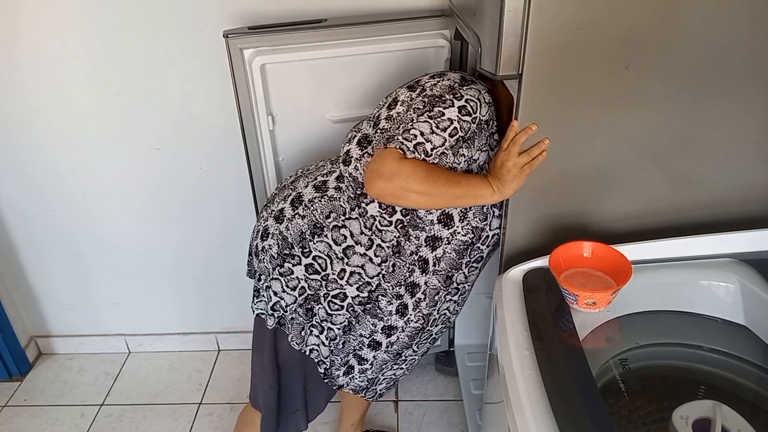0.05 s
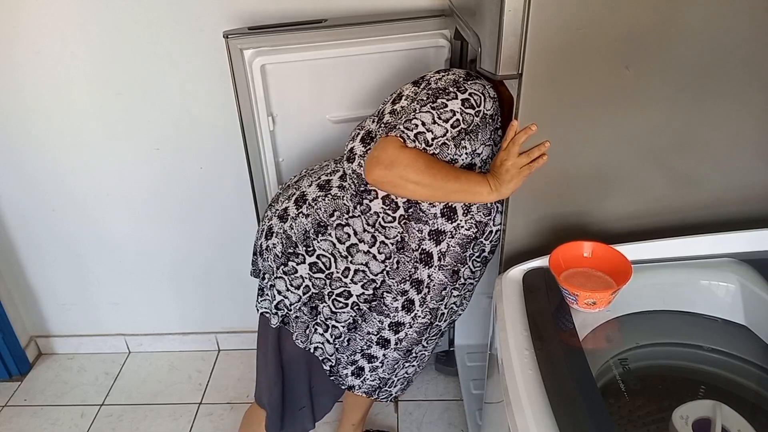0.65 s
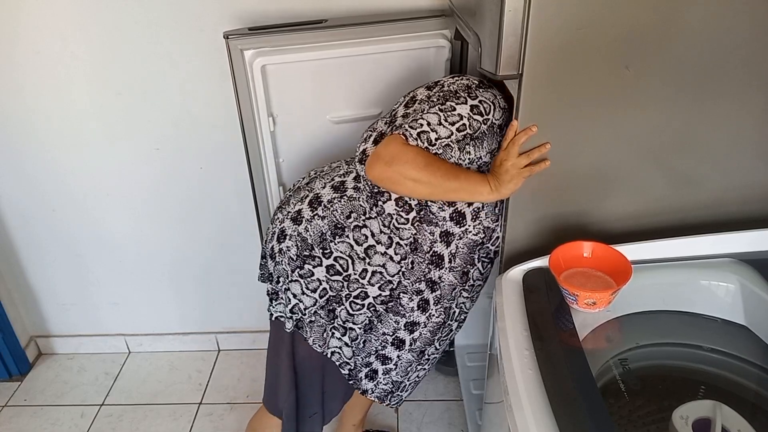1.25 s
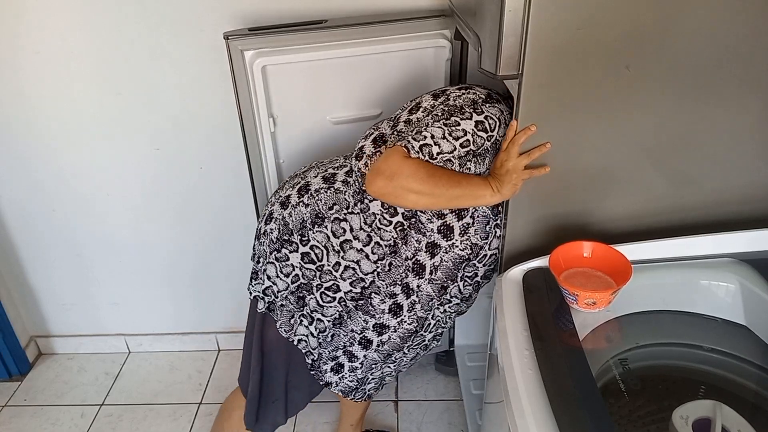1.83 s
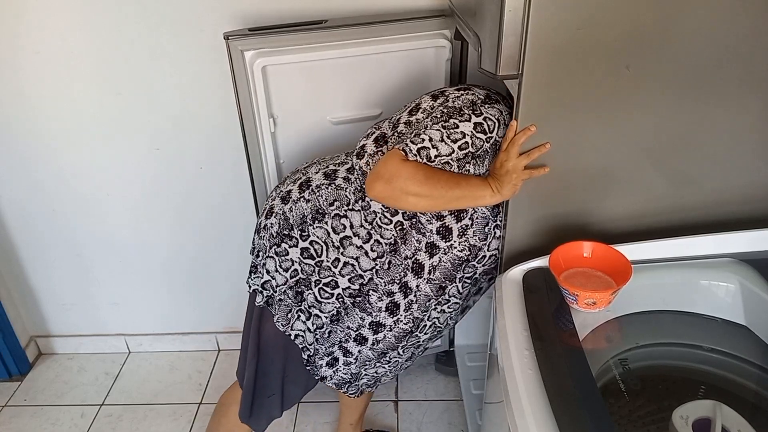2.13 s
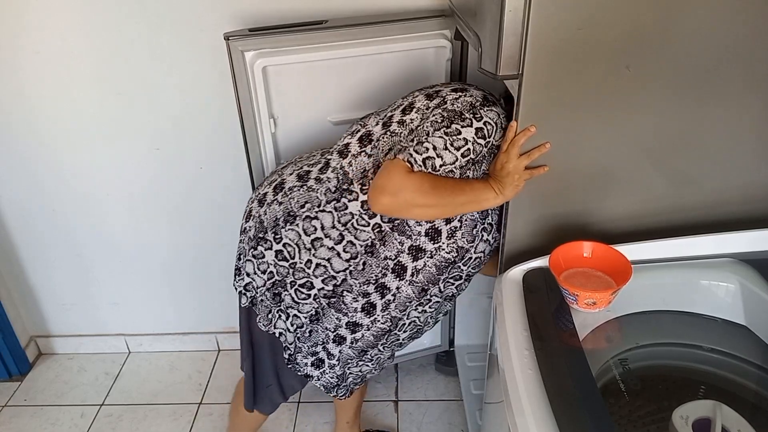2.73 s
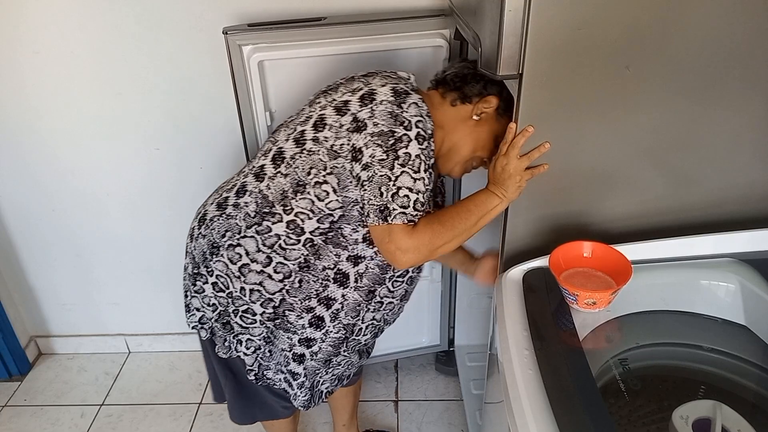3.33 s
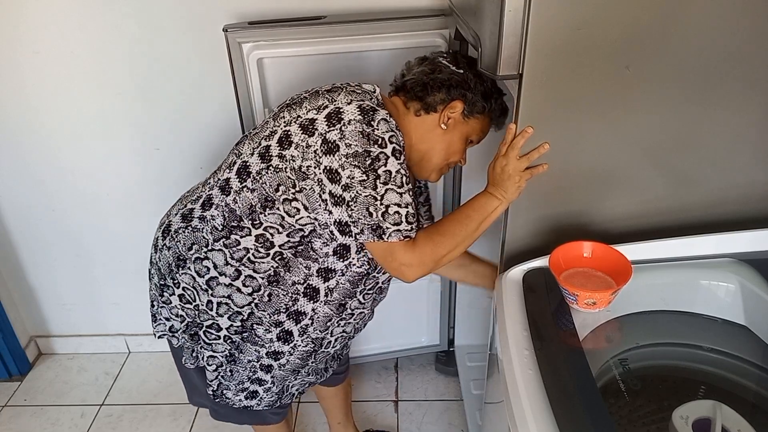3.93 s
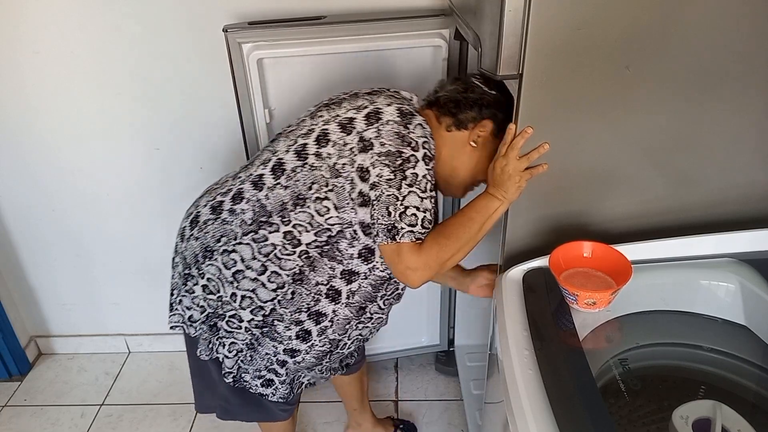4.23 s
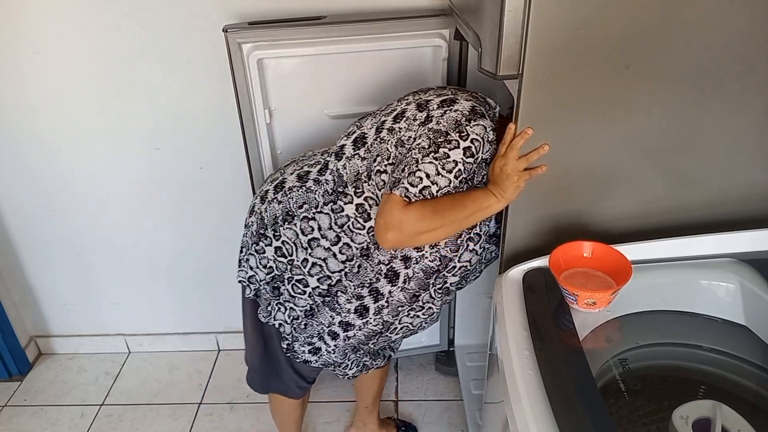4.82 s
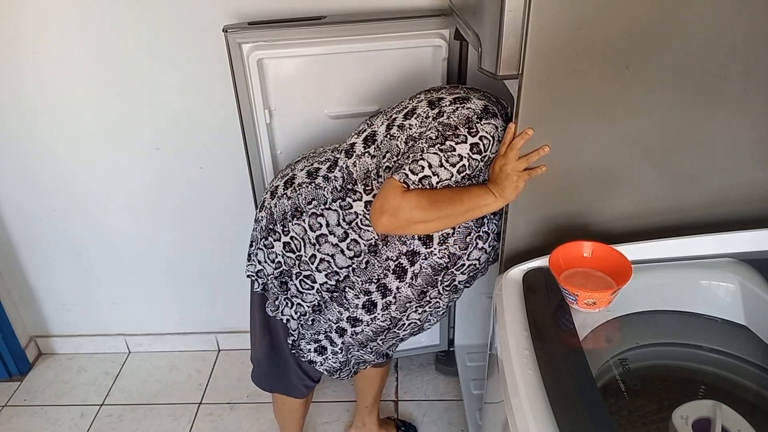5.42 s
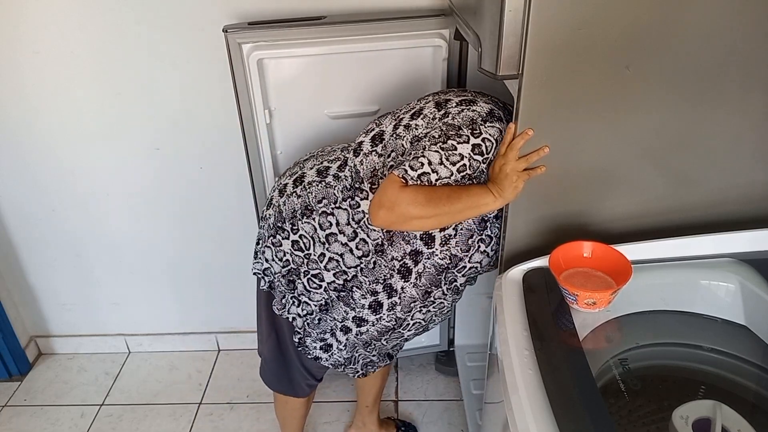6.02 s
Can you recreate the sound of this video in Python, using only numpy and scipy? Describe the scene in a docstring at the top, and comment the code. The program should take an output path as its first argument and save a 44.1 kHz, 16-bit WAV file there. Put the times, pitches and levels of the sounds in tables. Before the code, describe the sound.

In a small tiled room, hollow knocks ring through a refrigerator cabinet and shake its shelves as someone starts wiping it with a wet cloth. After one loud clump of bumps, the swishing strokes continue with softer knocks, plastic clicks and faint squeaks. Low traffic hush, a distant engine drone and a slight whine lie underneath. Muffled, bassy finger handling on the microphone joins the wiping at the end.

```python
"""A small tiled room, where someone wipes the inside of an open refrigerator with a wet cloth.
Fibres catch and slip on the liner, so each stroke hisses and a few squeak faintly. An arm bumps
the hollow cabinet, ringing its panels, and loose plastic fittings clatter. A far engine drones
over the hush of traffic and a thin machine whine. Near the end, fingers shift on the phone
and thud at its two microphone ports."""
import sys
import numpy as np
from scipy import signal
from scipy.fft import rfft, irfft, next_fast_len
from scipy.io import wavfile

SR = 44100
rng = np.random.default_rng(int(sys.argv[2]) if len(sys.argv) > 2 else 0)


def output_pcm(signal):
    """Save a mono or channel-first signal as 16-bit PCM at the path in sys.argv[1].

    Samples are clipped to [-1, 1] before scaling.
    """
    pcm = np.clip(np.atleast_2d(signal).T, -1, 1) * 32767
    wavfile.write(sys.argv[1], SR, np.round(pcm).astype(np.int16))


N = 267554
TOP_HZ = 15700


def undb(db):
    """Decibels to gain."""
    return 10 ** (np.asarray(db) / 20)


def at(points, hz):
    """Read (freq_hz, value) points on a log-frequency axis."""
    freqs, values = np.transpose(points)
    return np.interp(np.log(np.maximum(hz, 1)), np.log(freqs), values)


def colour(x, points):
    """Give a white signal a spectrum and keep its power."""
    size = next_fast_len(x.shape[-1])
    hz = np.arange(size // 2 + 1) * SR / size
    gain = undb(at(points, hz)) * (hz < TOP_HZ)
    gain /= np.sqrt(1 + (hz / points[-1][0] / 2) ** 2)  # roll off an octave above the last point
    gain /= np.sqrt(np.mean(gain ** 2))
    return irfft(rfft(x, size) * gain, size)[..., :x.shape[-1]]


def diffuse(size, alike_below_hz=542):
    """White room noise at two ports: long waves reach both alike, short ones do not."""
    mid, side = rfft(rng.standard_normal((2, next_fast_len(size))))
    hz = np.linspace(0, SR / 2, len(mid))
    alike = .97 / (1 + (hz / alike_below_hz) ** 4)
    mid, side = mid * np.sqrt((1 + alike) / 2), side * np.sqrt((1 - alike) / 2)
    return irfft(np.array([mid + side, mid - side]), next_fast_len(size))[:, :size]


def walk(rate_hz):
    """A random wander with a spread near one."""
    steps = rng.standard_normal(4096)
    return np.interp(np.arange(N) / SR * rate_hz, np.arange(len(steps)), steps)


def add(out, start_s, sound):
    """Mix a sound in at a time."""
    start = max(int(start_s * SR), 0)
    out[:, start:start + sound.shape[-1]] += sound[:, :N - start]


def ring(modes):
    """One second of decaying modes."""
    t = np.arange(SR) / SR
    return sum(undb(db) * np.sin(2 * np.pi * hz * t) * np.exp(-np.log(1000) * t / t60_s)
               for hz, db, t60_s in modes)


def push(response, hz, q):
    """A springy contact presses and rebounds, favouring the band around its own pitch."""
    return signal.lfilter(*signal.iirpeak(hz, q, fs=SR), response)


def low_cut(x, hz):
    """Steep high-pass."""
    return signal.sosfilt(signal.butter(6, hz, "high", fs=SR, output="sos"), x)


def sweep(start_s, length_s, peak_share=0.57):
    """Speed, from 0 to 1, of a hand that sets off, peaks and stops."""
    moments_s = start_s + length_s * np.array([0, np.clip(peak_share, .05, .95), 1])
    progress = np.interp(np.arange(N) / SR, moments_s, [0, .5, 1])
    return np.sin(np.pi * progress) * (progress < 1)


def ports(db, pan_db):
    """Gains at the left and right port; pan_db is left minus right."""
    return undb(db + np.array([[pan_db], [-pan_db]]) / 2)


def linger(power, t60_s):
    """Amplitude of a sound whose energy dies away in the room."""
    keep = np.exp(-2 * np.log(1000) / (t60_s * SR))
    return np.sqrt(signal.lfilter([1 - keep], [1, -keep], power + 1e-18))


def walls(x, count=6, echo_gain=.11):
    """Early echoes from tiles and metal comb a steady sound; they reach each port a little apart."""
    out = x.copy()
    for lag_s, skew_s in rng.uniform([.001, -.0002], [.012, .0002], (count, 2)):
        add(out[:1], lag_s, echo_gain * x[:1])
        add(out[1:], lag_s + skew_s, echo_gain * x[1:])
    return out / np.sqrt(1 + count * echo_gain ** 2)


# Reverb time of the tiled room: freq_hz, t60_s
ROOM_DECAY = [(80, 1), (250, 0.56), (700, 0.4), (2000, 0.41), (6000, 0.67), (15000, 0.27)]
def room_tail(spectrum):
    """Dense resonances die away in the room, the very top first and the bass last."""
    hz, t, bands = signal.stft(colour(diffuse(SR), spectrum), SR, nperseg=256)
    decay = np.exp(-np.log(1000) * t / at(ROOM_DECAY, hz)[:, None])
    return signal.istft(bands * decay, SR)[1][:, :SR]


# Fader moves of the traffic bed, building and then holding: time_s, hush_db, rumble_db
TRAFFIC_LEVELS = [(0, -61.5, -59.5), (.28, -62.5, -69.5), (.7, -59, -70.5), (1.15, -63, -67),
                  (1.7, -59.5, -55), (2.8, -55, -56.5), (4, -55.5, -54.5), (4.85, -55, -51.5),
                  (5.65, -53.5, -54), (6.07, -55, -58.5)]
# Tone of the soft tyre hush: freq_hz, gain_db
HUSH_EQ = [(200, -9), (380, 0.5), (570, 0.5), (720, -2.5), (1000, -2.5), (1400, -4), (2000, -5),
           (2500, -10.5), (3100, -22.5), (8000, -25.5), (15000, -46)]
# Tone of the low road rumble: freq_hz, gain_db
RUMBLE_EQ = [(25, -40), (50, 4.5), (90, 0.5), (130, 0.5), (165, -2), (195, 1), (260, -2), (400, -1.5),
             (600, -6.5), (1200, -20.5)]
def traffic(hush_trim_db=2.0, flicker_db=1.65):
    """Far traffic swells slowly: tyre hush above a low rumble."""
    times_s, *levels = np.transpose(TRAFFIC_LEVELS)
    hush_db, rumble_db = [np.interp(np.arange(N) / SR, times_s, db) for db in levels]
    hush = colour(diffuse(N), HUSH_EQ) * undb(hush_db + hush_trim_db + flicker_db * walk(8.1))
    rumble = colour(diffuse(N), RUMBLE_EQ) * undb(rumble_db + flicker_db * walk(12))
    return hush + rumble


# Swells of the engine drone: peak_s, level_db, firing_hz, rise_db_per_s, fall_db_per_s
ENGINE_SWELLS = [(4.1, -47.5, 56.9, 13.5, 32), (4.87, -51.5, 57.7, 83, 143)]
def far_engine():
    """Only the firing tone of a far engine gets indoors, swelling and fading."""
    t, drone = np.arange(N) / SR, 0
    for peak_s, db, hz, rise, fall in ENGINE_SWELLS:
        fade_db = np.maximum(rise * (peak_s - t), fall * (t - peak_s))
        drone += undb(db - fade_db) * np.sin(2 * np.pi * hz * t)
    return np.sqrt(2) * drone


# Faint machine tones: pitch_hz, level_db
WHINE_TONES = [(596, -70), (1190, -80.5), (1296, -81.5)]
def machine_whine(waver_db=3, drift_share=0.0042):
    """Thin machine tones waver in level and pitch."""
    whine = 0
    for hz, db in WHINE_TONES:
        level = undb(db + waver_db * walk(2.88))
        pitch_hz = hz * (1 + drift_share * walk(8.8))
        whine += level * np.sin(2 * np.pi * np.cumsum(pitch_hz) / SR)
    return np.sqrt(2) * whine


# Finger slides on the phone: start_s, length_s, level_db, pan_db
FINGER_SLIDES = [(5.016, 0.36, -48.5, -19), (5.378, 0.17, -45.5, 37.5), (5.456, .29, -36.5, 3),
                 (5.741, 0.19, -38.5, 19.5), (5.928, 0.086, -45.5, 2), (6.023, 0.089, -49, 24)]
# Bassy tone of rubbing skin: freq_hz, gain_db
SKIN_EQ = [(35, -40), (55, -0.5), (80, 6.5), (120, 3), (180, -15), (260, -15.5), (450, -30), (900, -65)]
# Dull ring of the phone body: pitch_hz, level_db, t60_s
PHONE_MODES = [(78.4, -10, 0.03), (105, 1, 0.045), (185, -7, 0.025)]
# Handling thuds: start_s, level_db, pitch_hz, pan_db
FINGER_THUDS = [(5.076, -43.5, 103, -30), (5.237, -37, 106, -24.5), (5.286, -40, 107, -32),
                (5.43, -56, 98, 15), (5.4484, -24, 177, 37), (5.493, -35, 121, -34),
                (5.511, -28.5, 121, -13), (5.537, -31, 94, 28.5), (5.578, -25.5, 99.7, 11),
                (5.713, -31.5, 100, 10), (5.81, -26.5, 192, 18), (5.874, -41.5, 95.5, 29)]
def fingers(thud_trim_db=1, slide_trim_db=-1.5):
    """Skin rubs and thuds on the phone; each port feels mainly the finger nearest to it."""
    rubbing = sum(ports(db + slide_trim_db, pan_db) * sweep(start_s, length_s)
                  for start_s, length_s, db, pan_db in FINGER_SLIDES)
    out = colour(rng.standard_normal((2, N)), SKIN_EQ) * rubbing
    body = -ring(PHONE_MODES)
    for start_s, db, hz, pan_db in FINGER_THUDS:
        add(out, start_s, push(body * ports(db + thud_trim_db, pan_db), hz, q=1.56))
    return out


# Light clacks of loose fittings: start_s, level_db
FITTING_CLACKS = [(.893, -51), (.962, -54), (2.934, -45), (2.964, -54), (3.053, -48.5), (5.295, -52),
                  (5.585, -50.5), (5.62, -53.5)]
# Tone of knocked plastic: freq_hz, gain_db
PLASTIC_EQ = [(150, -13.5), (600, -2.5), (1000, 4.5), (1400, -7.5), (2200, -7), (3500, -9), (6000, -15.5),
              (15000, -30)]
def fittings(crack_boost=0.25, crack_s=0.042):
    """Plastic knocks inside the cabinet: a short crack, then mostly reverberation."""
    out = np.zeros((2, N))
    attack = 1 + crack_boost * np.exp(-np.arange(SR) / SR / crack_s)
    for start_s, db in FITTING_CLACKS:
        add(out, start_s, undb(db) * attack * room_tail(PLASTIC_EQ))
    return out


# Hollow ring of the panels and the standing waves they feed: pitch_hz, level_db, t60_s
CABINET_MODES = [(92.5, -2.5, 0.21), (96.4, -4, 0.81), (107.4, 7.5, 0.195), (127, -4.5, 0.92),
                 (133, 14, 0.027), (160.6, -5, 0.38), (187.8, 2.5, 0.36), (216.4, -9.5, 0.54),
                 (241.3, -4, 0.77), (279.4, -6.5, 0.39), (328, -12.5, 0.16), (423, -5.5, 0.31),
                 (450, -5, 0.073), (473, -17.5, 0.27), (560, -6.5, 0.13), (853, -0.5, 0.33)]
# Tone of the shaken shelves and room: freq_hz, gain_db
RATTLE_EQ = [(60, -45), (120, -20), (250, 1), (400, -4), (480, -2.5), (620, -5), (850, -17), (1400, -15),
             (2000, -25.5), (3200, -27), (6000, -38), (15000, -41)]
# Arm hits on the cabinet: start_s, level_db, pitch_hz, springiness_q, rattle_db
ARM_BUMPS = [(.385, -56, 234, 4.2, -82), (.857, -44, 272, 3.6, -51), (.87, -29, 232.6, 2.7, -46),
             (.893, -31.5, 191, 1.1, -45), (.926, -56, 229, 2, -48), (0.935, -37, 101, 1.7, -46),
             (1.218, -38.5, 83.7, 5.7, -56), (1.43, -45, 460, 1.8, -40), (1.437, -18, 456, 0.95, -31),
             (1.454, -9.5, 158, 0.15, -30.5), (1.4644, -9, 138, 0.72, -38), (1.478, -22, 512, 2.3, -33.5),
             (1.496, -29, 160, 0.22, -34.5), (2.276, -41.5, 93, 2.6, -75), (2.521, -44.5, 298, 6.9, -47.5),
             (2.531, -47, 112, 2.9, -54), (2.962, -46.5, 132, 5.3, -52.5), (3.535, -38.5, 132, 1.2, -50.5),
             (3.956, -43, 131, 6.1, -51), (4.647, -50, 190.5, 1.3, -57)]
def cabinet(radiate_hz=74, left_lag_s=0.00039):
    """Each blow presses the panels inward, rings them and shakes the shelves."""
    out, panels = np.zeros((2, N)), ring(CABINET_MODES)
    for start_s, db, hz, q, rattle_db in ARM_BUMPS:
        knock = push(push(panels, hz, q), hz, q)  # both the arm and the liner give way
        knock *= undb(db) / np.abs(knock).max()
        pair = np.array([np.roll(knock, int(left_lag_s * SR)), knock])  # a little to the right
        add(out, start_s, pair + undb(rattle_db) * room_tail(RATTLE_EQ))
    return low_cut(out, radiate_hz)  # the panels are too small to radiate the longest waves


# Damp cloth squeaking on smooth plastic: centre_s, length_s, pitch_hz, level_db
CLOTH_SQUEAKS = [(3.558, 0.098, 1900, -59), (5.169, 0.36, 1850, -58), (5.32, .1, 3000, -59),
                 (5.665, .2, 1820, -62), (5.814, 0.15, 1880, -66)]
def squeaks(width_hz=260):
    """Stick and slip briefly gather into a rough, faint tone."""
    out = np.zeros((2, N))
    for centre_s, length_s, hz, db in CLOTH_SQUEAKS:
        size = int(length_s * SR)
        rub = push(diffuse(SR)[:, :size], hz, q=hz / width_hz)
        add(out, centre_s - length_s / 2, undb(db) * np.hanning(size) * rub / rub.std())
    return out


# Bright, wet top of a wipe: freq_hz, gain_db
HISS_EQ = [(2500, -7), (5000, -2), (6300, -5), (7400, 0.5), (8500, -4), (10500, 0), (12500, 2),
           (14000, -0.5), (15700, -6)]
# Midrange body of a wipe: freq_hz, gain_db
SCRUB_EQ = [(300, -21), (700, 2.5), (1300, -4), (1900, -0.5), (2600, -2), (3500, -0.5), (4800, -7),
            (6500, -7.5), (10000, -16)]
# Wipes, one per sweep of the arm: start_s, length_s, peak_share, hiss_db, scrub_db
CLOTH_STROKES = [(0, 0.17, 0, -78, -76), (0.397, 0.12, 0, -75, -74), (.55, 0.43, .3, -82.5, -83),
                 (0.872, .3, 0.41, -58, -58.5), (1.042, 0.59, 0.3, -52.5, -60.5),
                 (1.584, 0.2, 0.63, -55.5, -56.5), (1.81, 0.28, 0.38, -57.5, -60.5),
                 (2.06, 0.29, 0.63, -55, -61), (2.36, .14, .2, -73, -69),
                 (2.528, 0.036, 0.23, -64.5, -58.5), (2.594, 0.22, 0.32, -57.5, -61.5),
                 (2.896, .2, 0.3, -58.5, -63), (3.024, 0.6, 0.31, -60, -66),
                 (3.44, 0.64, 0.3, -60.5, -67.5), (3.84, 0.42, 0.53, -60.5, -64.5),
                 (4.198, 0.31, 0.8, -62.5, -65.5), (4.463, 0.22, 0.74, -57.5, -59),
                 (4.75, 0.22, .45, -58.5, -61), (5.029, 0.19, 0.66, -56.5, -61.5),
                 (5.306, .11, 0.55, -58, -58.5), (5.472, 0.12, 0.68, -55.5, -56),
                 (5.692, .22, 0.15, -58, -59), (5.956, 0.23, 0.63, -56.5, -61)]
def cloth(hiss_trim_db=1.1, scrub_trim_db=4.0, grain_db=0.5, catch_db=0.6, turn_s=0.042):
    """Wet fibres catch and slip on the liner in countless tiny grains, louder as the hand speeds up."""
    hiss_power, scrub_power = 0, 0
    for start_s, length_s, peak_share, hiss_db, scrub_db in CLOTH_STROKES:
        # strokes stretch at both ends, overlapping as the hand turns round
        speed = sweep(start_s - turn_s, length_s + 2 * turn_s, peak_share)
        hiss_power += (undb(hiss_db + hiss_trim_db) * speed) ** 2
        scrub_power += undb(scrub_db + scrub_trim_db) ** 2 * speed
    slips = undb(-grain_db * walk(900) + catch_db * walk(45))
    # the tiles keep each stroke alive, the midrange longer than the treble
    hiss = colour(diffuse(N) * slips, HISS_EQ) * linger(hiss_power, t60_s=0.18)
    scrub = colour(diffuse(N) * slips, SCRUB_EQ) * linger(scrub_power, t60_s=0.27)
    return hiss * ports(0, pan_db=1.2) + scrub


def scene():
    """The cleaning, its surroundings and the hand that holds the phone."""
    contacts = cabinet() + fittings() + squeaks()
    return contacts + walls(cloth() + traffic()) + far_engine() + machine_whine() + fingers()


def record(dry, low_cut_hz=43):
    """The phone drops the deepest bass and cuts the top."""
    top_cut = signal.ellip(10, .2, 80, TOP_HZ, fs=SR, output="sos")
    return signal.sosfilt(top_cut, low_cut(dry, low_cut_hz))


dry = scene()
out = record(dry)
output_pcm(out)
```